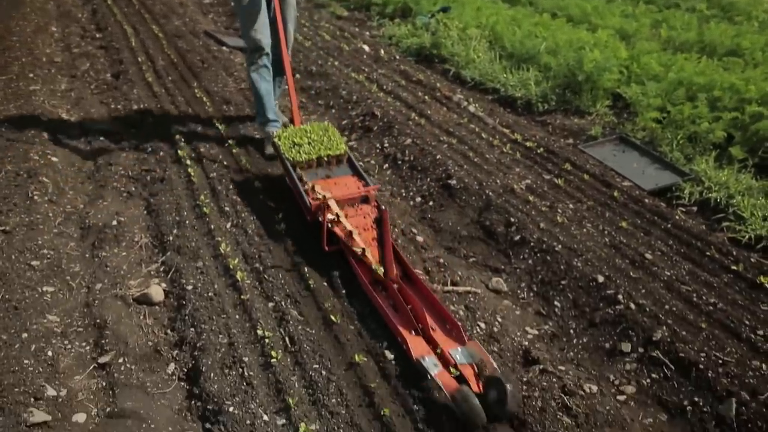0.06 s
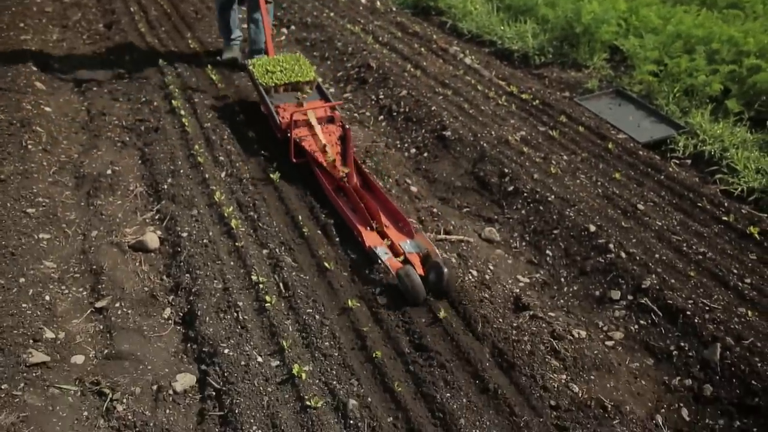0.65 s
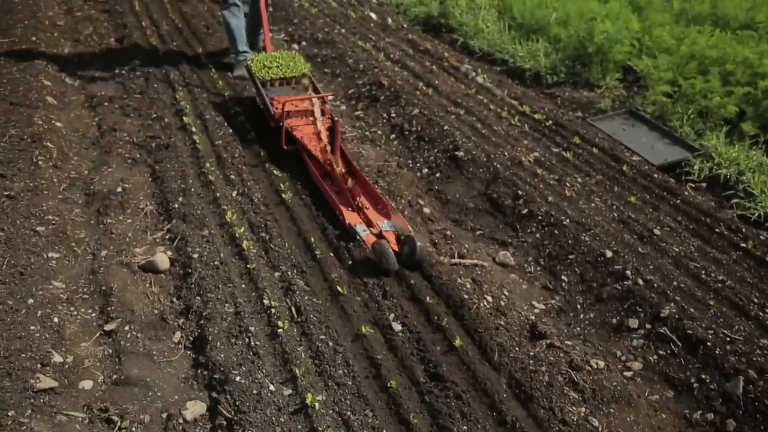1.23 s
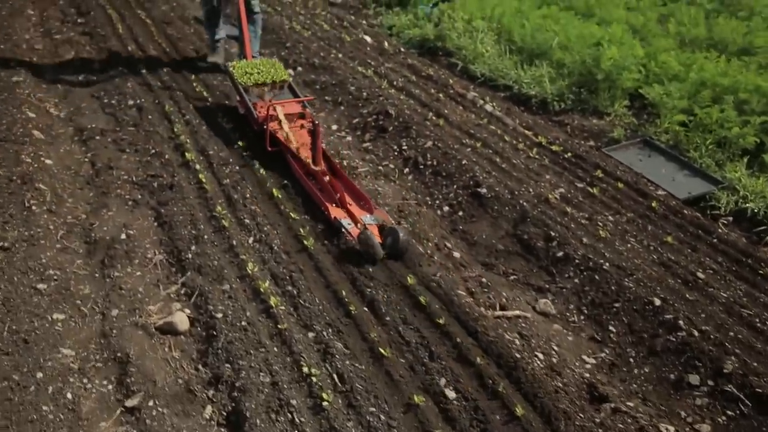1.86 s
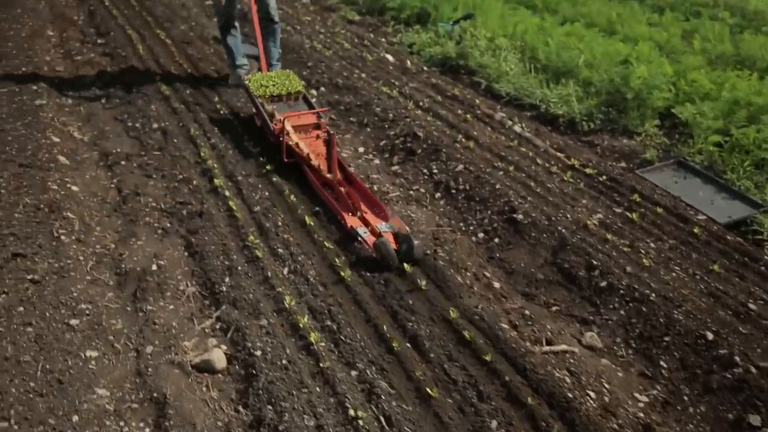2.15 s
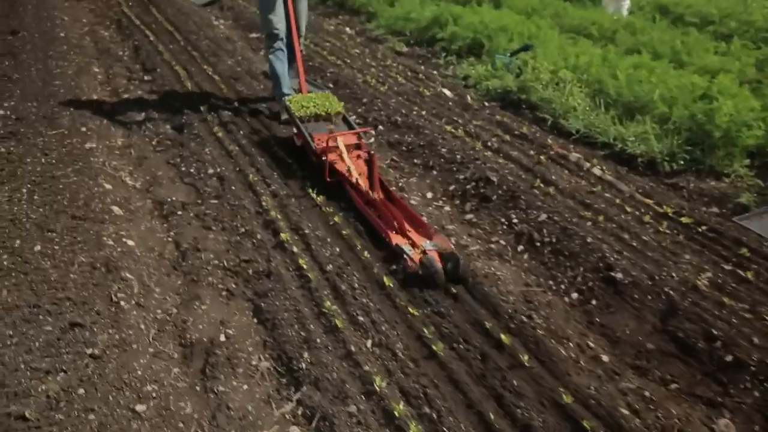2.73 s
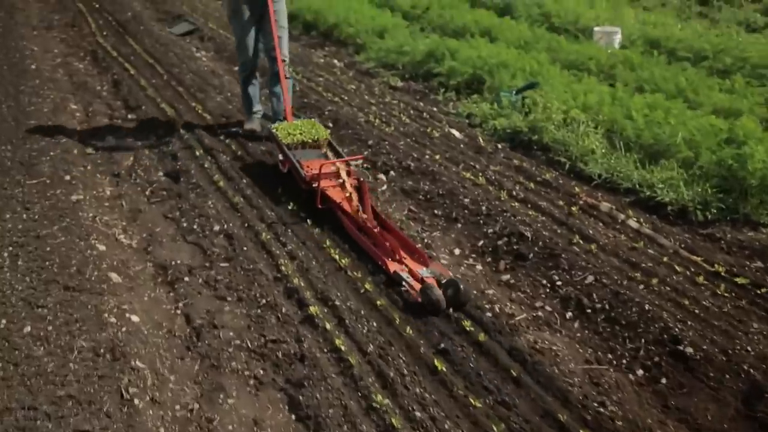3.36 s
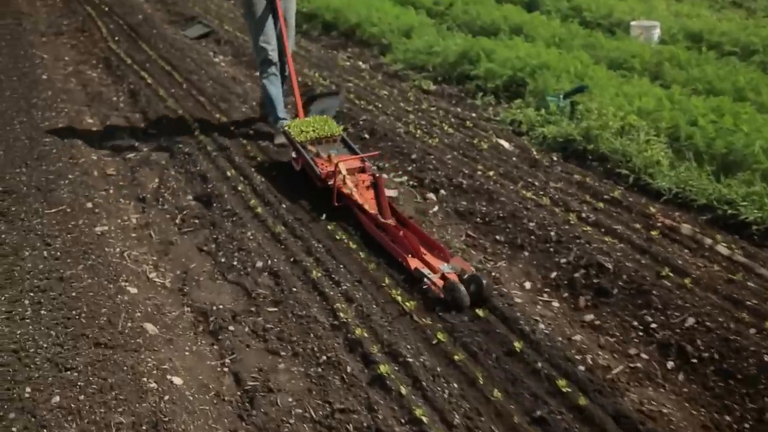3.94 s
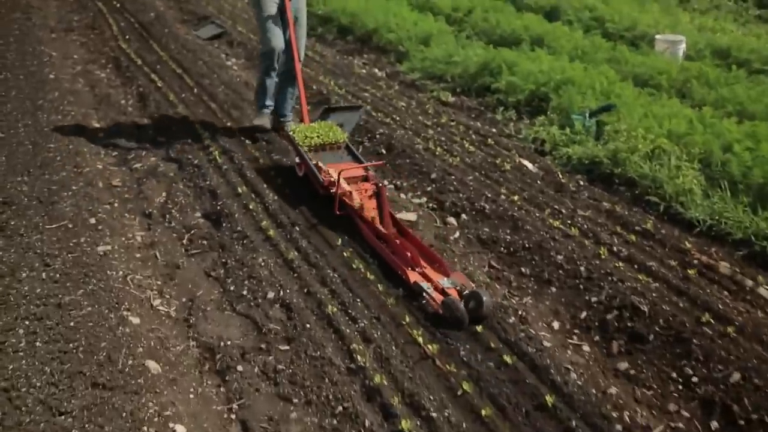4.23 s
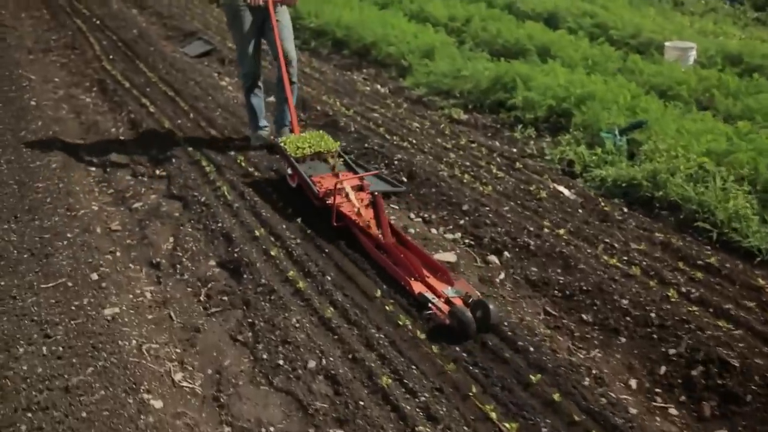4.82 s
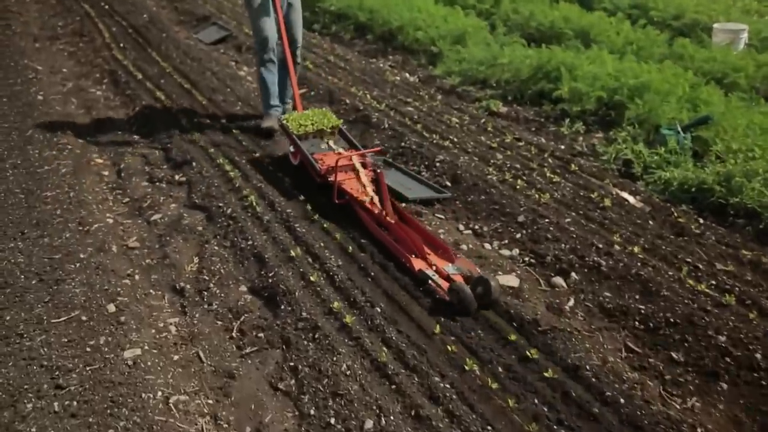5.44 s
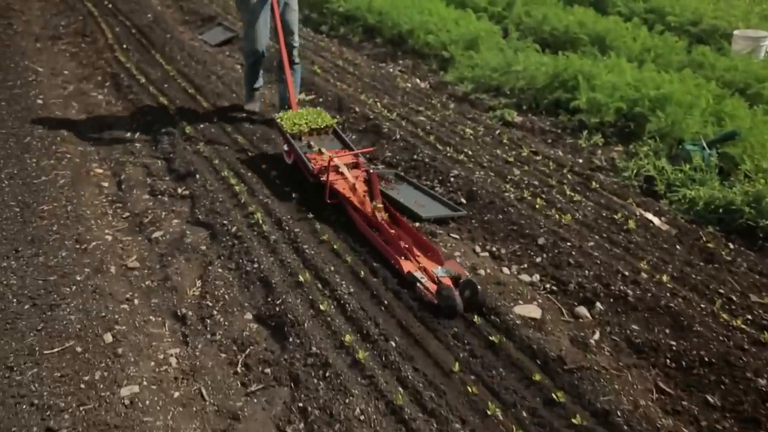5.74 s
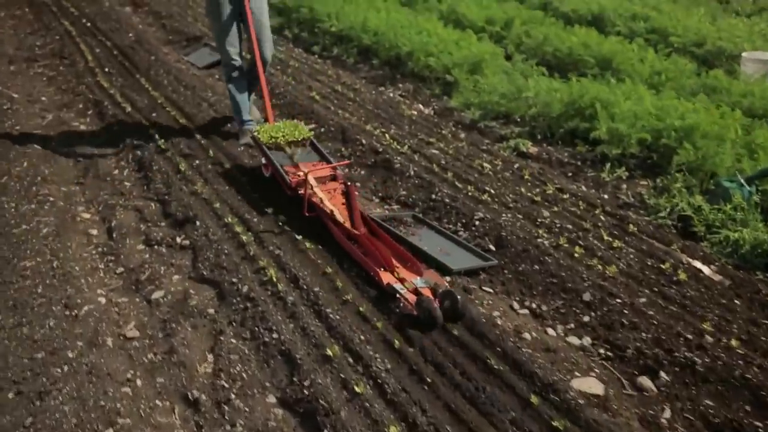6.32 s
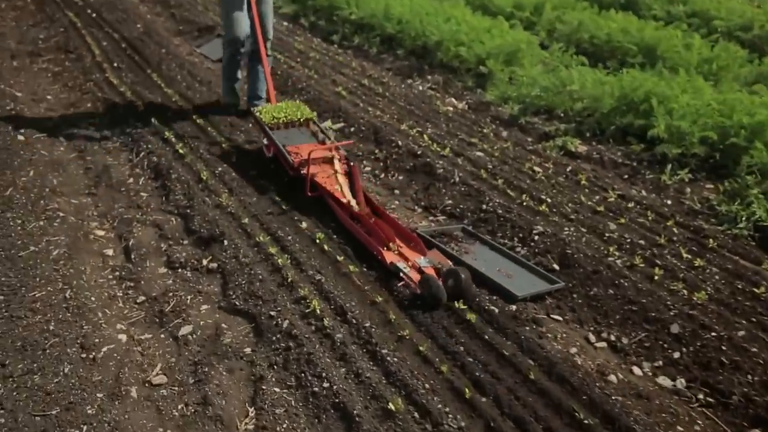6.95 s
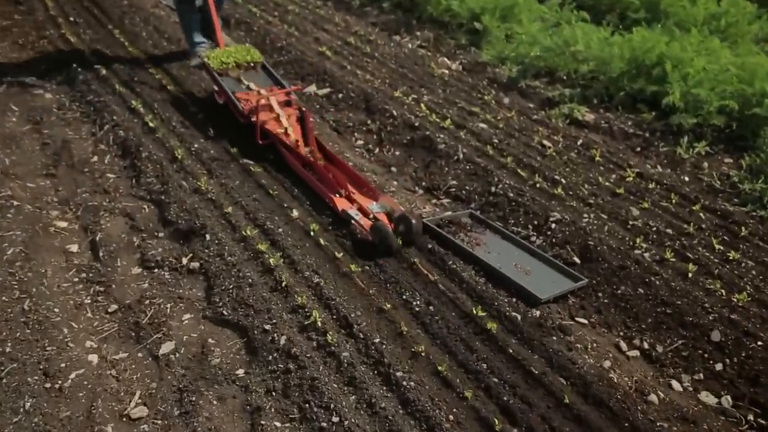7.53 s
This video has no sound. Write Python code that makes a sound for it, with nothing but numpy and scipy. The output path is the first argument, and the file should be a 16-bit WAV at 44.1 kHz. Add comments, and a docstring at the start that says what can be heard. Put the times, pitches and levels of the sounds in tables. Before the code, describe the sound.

A hand-pulled seedling transplanter scrapes and crunches through loose, stony soil, over outdoor hiss and a thin, high insect trill.

```python
"""Scraping and crunching: the steel furrower of a hand-pulled seedling transplanter drags through loose,
stony soil, and the grit rings faintly in its frame. A bush cricket's wing strokes trill thinly over
open-air hiss. Wind puffs at the microphone, and three soft double knocks pass through the camera body.
A dropped plastic tray snaps onto the ground; later the steel grinds once over stones."""
import sys
import numpy as np
from scipy import signal
from scipy.fft import rfft, irfft, next_fast_len
from scipy.io import wavfile
from scipy.ndimage import uniform_filter1d, map_coordinates

SR = 44100
rng = np.random.default_rng(int(sys.argv[2]) if len(sys.argv) > 2 else 0)


def to_wav(sig):
    """Store sig (one row per channel, or 1-D mono) as 16-bit WAV at the path in sys.argv[1].

    Samples outside -1..1 are clipped; the rate is SR.
    """
    pcm = np.clip(np.atleast_2d(sig), -1, 1) * 32767
    pcm = np.round(pcm).astype(np.int16)
    wavfile.write(sys.argv[1], SR, pcm.T)  # frames by channels


N = 334278
TIME_S = np.arange(N) / SR
FFT_SIZE = 2 * next_fast_len(N // 2 + 8192)
FREQS_HZ = np.fft.rfftfreq(FFT_SIZE, 1 / SR)


def amp(db):
    """Decibels to gain."""
    return 10 ** (np.asarray(db) / 20)


def unit(x):
    """Scale a signal or a frequency response to rms 1."""
    return x / np.sqrt(np.mean(np.abs(x) ** 2) + 1e-20)


def curves(rows):
    """Per-sample curve for each column after the time."""
    times_s, *columns = np.transpose(rows)
    return [np.interp(TIME_S, times_s, column) for column in columns]


def wobble(knots_per_s):
    """Smooth random curve."""
    return map_coordinates(rng.standard_normal(int(N * knots_per_s / SR) + 4), [TIME_S * knots_per_s])


def swell(centre_s, half_length_s):
    """Gaussian rise and fall."""
    return np.exp(-np.minimum(((TIME_S - centre_s) / half_length_s) ** 2, 50))


def filtered(x, response):
    """Apply a frequency response."""
    return irfft(rfft(x, FFT_SIZE) * response, FFT_SIZE)[:N]


def colour(points):
    """Causal unit-power response through (frequency [Hz], level [dB]) points."""
    hz, db = np.transpose(points)
    gain = amp(np.interp(np.log(FREQS_HZ + 1), np.log(hz), db))
    cepstrum = irfft(np.log(gain))
    cepstrum[1:FFT_SIZE // 2] *= 2  # fold to minimum phase
    cepstrum[FFT_SIZE // 2 + 1:] = 0
    return unit(np.exp(rfft(cepstrum)))


def resonances(modes):
    """Summed band-pass responses of the modes."""
    return sum(amp(db) * 1j * FREQS_HZ * width_hz / (hz * hz - FREQS_HZ ** 2 + 1j * FREQS_HZ * width_hz)
               for hz, width_hz, db in modes)


def grains(per_s, spread_db, rub):
    """Tiny fractures of uneven size over a share of smooth rubbing; rms 1."""
    sizes = amp(spread_db * np.minimum(rng.exponential(size=N), 4))
    cracks = (rng.random(N) < per_s / SR) * sizes * np.sign(rng.standard_normal(N))
    return unit(unit(cracks) + rub * rng.standard_normal(N))


def soil_shares(db, coarse_db, easy_pull_db=-41):
    """Grit, clod and sand gains: coarse ground gives more clods, less sand; sand gains less from force."""
    clods_db = db - 5 + coarse_db
    sand_db = db - 4 - 0.52 * (db - easy_pull_db) - 0.4232 * coarse_db
    return amp([db, clods_db, sand_db]).reshape(3, -1)


def sliding_forces(stick_slip_db):
    """Grit, clod and sand forces from drag and shoves; the blade sticks and slips."""
    # steady pull: (time [s], level [dB], coarseness [dB])
    drag = [(0, -43.5, -2.5), (0.5, -46.5, -1), (0.9, -45, -4), (1.42, -47.5, -1), (2.0, -40, -2),
            (2.31, -37, -2), (2.39, -46.5, -2), (2.8, -49.5, 5), (2.86, -43, 2), (2.99, -46.5, 2.5),
            (3.14, -40.5, -2), (3.62, -45, 3), (4.3, -45.5, -4.5), (4.8, -46, -0.5), (5.3, -43, -3),
            (5.55, -45, 0.5), (6.25, -41, -2.5), (6.85, -48, 1), (7.05, -40, -1.5), (7.4, -43.5, -6),
            (7.58, -38.5, -7)]
    # tugs shoving heaps of soil: (centre [s], level [dB], half length [s], coarseness [dB])
    shoves = [(0.22, -34, 0.034, -1.5), (0.41, -42, 0.043, 0), (1.026, -43.5, 0.037, 5.5),
              (1.133, -43.5, 0.076, -6), (1.838, -38.5, 0.051, -8), (1.944, -35.5, .025, -6),
              (1.986, -43.5, 0.033, 9), (2.14, -37, 0.076, -6), (2.398, -54, 0.02, -35),
              (3.334, -41, 0.059, -14), (3.59, -43, .02, 7), (3.72, -42.5, 0.03, 3),
              (3.92, -42.5, 0.073, 8), (4.103, -41, 0.051, 0), (4.41, -37, 0.032, 0.5),
              (4.537, -40.5, 0.069, 3.5), (4.69, -40, .025, -1), (5.252, -51, .04, -23),
              (5.372, -37, 0.023, -1.5), (5.849, -33, 0.028, -4), (6.182, -30.5, 0.027, -4.5),
              (6.449, -25.5, .02, -8), (6.61, -38, 0.074, 2), (6.77, -37.5, .018, -2.5),
              (6.973, -36.5, 0.038, -8), (7.197, -41, 0.041, 11), (7.26, -32.5, 0.011, -8)]
    power = soil_shares(*curves(drag)) ** 2
    for centre_s, db, half_length_s, coarse_db in shoves:
        power += (soil_shares(db, coarse_db) * swell(centre_s, half_length_s)) ** 2
    return np.sqrt(power) * amp(stick_slip_db * wobble(90))


def crumbs(count=80, gap_scale_s=1 / 6, db=-43, spread_db=1, length_s=0.003, coarse_spread_db=5):
    """Small crumbs breaking at random, as extra crunch rows."""
    times_s = gap_scale_s * np.cumsum(rng.uniform(0.1, 2, count))
    return [(time_s, db + spread_db * loud, length_s, coarse_spread_db * coarse)
            for time_s, (loud, coarse) in zip(times_s, rng.standard_normal((count, 2)))
            if time_s < TIME_S[-1]]


def crunch_forces(attack_s=0.00055, snap_db=-0.5, snap_s=0.0016, trickle_db=-14.5, trickle_s=0.022):
    """Grit, clod and sand forces from crunches: each snaps, crumbles, then trickles."""
    # stones and clods cracking: (time [s], level [dB], length [s], coarseness [dB])
    crunches = [(0.122, -37.5, 0.0046, 10.5), (0.39, -30.5, 0.0066, -5), (0.591, -42, 0.0099, 9.5),
                (0.87, -34, 0.011, -10), (0.926, -35, 0.0057, -14), (0.997, -33, 0.011, -1),
                (1.171, -37, .011, -15), (1.591, -32.5, .02, -2), (1.737, -31, 0.015, -1.5),
                (1.789, -35, .018, -2), (2.023, -36.5, 0.013, -8), (2.189, -30.5, 0.011, 5),
                (2.255, -34, 0.0035, -12), (2.34, -33.5, 0.027, -20), (2.597, -35, 0.0094, -10),
                (2.76, -43.5, .011, 11.5), (2.959, -33, .008, 0), (3.018, -39.5, 0.013, 7.5),
                (3.255, -29.5, 0.0091, -12), (3.304, -32.5, 0.0046, 13), (3.5642, -27.5, 0.0098, 3),
                (3.746, -29.5, 0.012, -5), (3.829, -25, .034, -4), (3.852, -26.5, 0.021, 5),
                (3.946, -36, 0.024, -3), (4.039, -35.5, .008, 0), (4.126, -34.5, 0.014, -0.5),
                (4.427, -30, 0.023, 9.5), (4.45, -27.5, 0.019, 0.5), (4.471, -27.5, .019, 5),
                (4.51, -29, 0.0078, 4.5), (4.631, -34, 0.0071, -4), (4.876, -29, 0.0086, -1.5),
                (5.061, -35.5, 0.0037, 8), (5.186, -39, 0.0093, -26), (5.301, -34, 0.012, -7),
                (5.4, -28, 0.01, -1), (5.687, -30, 0.0079, -4), (5.754, -32, 0.029, 0),
                (5.801, -29, 0.026, 7.5), (5.818, -26.5, .0093, -2), (5.926, -30.5, 0.013, 2),
                (5.951, -30.5, 0.017, -2), (6.2637, -18.5, 0.013, -0.5), (6.316, -24.5, 0.014, -2),
                (6.557, -34.5, 0.018, 15.5), (6.629, -27, .007, -6), (6.657, -36, 0.022, 10.5),
                (6.833, -36, .0048, -14), (6.91, -24.5, 0.0057, 7), (7.497, -35, 0.02, 3)]
    force = np.zeros((3, N))
    for time_s, db, length_s, coarse_db in crunches + crumbs():
        start = int(time_s * SR)
        t = TIME_S[:min(SR // 8, N - start)]
        snap = amp(snap_db) * np.exp(-t / snap_s)
        crumble = np.exp(-(t / length_s) ** 2.1)
        trickle = amp(trickle_db) * np.exp(-t / trickle_s)
        burst = (1 - np.exp(-t / attack_s)) * np.sqrt(snap ** 2 + crumble ** 2 + trickle ** 2)
        force[:, start:start + len(t)] += soil_shares(db, coarse_db) * burst
    return force


def furrower():
    """Sliding and crunching break grit, clods and sand; all three ring a little in the frame."""
    # steel frame: (frequency [Hz], width [Hz], gain [dB])
    frame_modes = [(702, 80, -8.5), (850, 64, 0.5), (1094, 170, -8), (1862, 215, 4), (2252, 21, 1.5),
                   (3010, 420, -7), (3310, 62, 2.5), (3630, 200, 3.5), (3994, 144, 1), (6640, 810, -10.5),
                   (9360, 1700, -5.5)]
    # soil spectra: (frequency [Hz], density [dB])
    grit_spectrum = [(500, -39), (1100, -7), (1600, -3), (2800, 2), (3900, -4), (5000, -4.5), (7000, -12.5),
                     (14000, -23)]
    clod_spectrum = [(150, -13), (420, -14.5), (620, -0.5), (950, -2.5), (1300, -0.5), (1700, -10.5),
                     (3000, -38)]
    sand_spectrum = [(2500, -46.5), (4500, 0.5), (6000, 2), (7300, 1.5), (8200, -1), (10000, -2.5),
                     (11500, -4.5), (15500, -6)]
    crunching = crunch_forces()
    sliding = sliding_forces(stick_slip_db=1.66)
    grit_force, clod_force, sand_force = np.hypot(sliding, crunching)  # power sum
    grit = grit_force * grains(per_s=2700, spread_db=3, rub=0.7)
    clods = clod_force * grains(per_s=2000, spread_db=5, rub=0.7)
    sand = sand_force * grains(per_s=2500, spread_db=3.5, rub=0.66)
    frame = 1 + resonances(frame_modes)
    return (filtered(grit, unit(colour(grit_spectrum) * frame))
            + filtered(clods, unit(colour(clod_spectrum) * frame))
            + filtered(sand, unit(colour(sand_spectrum) * frame)))


def earth():
    """Soft earth pushed aside: a dull, grainy rustle."""
    # push on the earth: (time [s], level [dB])
    push = [(0, -54.5), (1.85, -56), (2.25, -46), (2.75, -48.5), (2.95, -56), (3.28, -42.5), (3.5, -51),
            (3.92, -46.5), (4.15, -57.5), (4.45, -48.5), (5.3, -51.5), (7.57, -54.5)]
    dull = colour([(80, -24.5), (220, 0.5), (340, 1), (500, 0.5), (800, -8), (2000, -71)])
    return amp(curves(push)[0]) * filtered(grains(per_s=700, spread_db=2.5, rub=1), dull)


def changing_contact(x, depth_db):
    """Each stone and clod has its own resonances, so the colour shifts as the blade moves on."""
    spectra = signal.stft(x, nperseg=512)[2]
    shading = rng.standard_normal(spectra.shape)
    for size, axis in [(3, 0), (7, 1), (3, 1)]:  # smooth in frequency, then twice in time
        shading = uniform_filter1d(shading, size=size, axis=axis)
    shaded = spectra * amp(depth_db * unit(shading))
    shaded *= np.linalg.norm(spectra, axis=0) / (np.linalg.norm(shaded, axis=0) + 1e-20)  # keep power
    return signal.istft(shaded, nperseg=512)[1][:N]


def air():
    """Open-air background and faint steady hiss."""
    # background spectrum: (frequency [Hz], density [dB])
    spectrum = [(15, -43), (25, -14), (60, -0.5), (120, 6), (180, -1.5), (310, 1.5), (450, -11), (700, 0.5),
                (1500, -5.5), (3500, -5), (5500, -9.5), (11000, -9), (14000, -6), (15600, -4)]
    return amp(-42.5 + 0.18 * wobble(6.1)) * filtered(rng.standard_normal(N), colour(spectrum))


def cricket(db, strokes_per_s, stroke_width_cycles):
    """Each wing stroke is a brief rasp at the top of hearing."""
    cycle = np.cumsum(strokes_per_s + 0.87 * wobble(6.7)) / SR % 1
    strokes = np.exp(-((cycle - 0.5) / stroke_width_cycles) ** 2) * amp(2 * wobble(40))
    wing = colour([(8000, -36), (12000, -5), (14300, -15), (15000, -9), (15600, 0), (16500, 4),
                   (18000, -28)])
    return amp(db) * unit(filtered(strokes * rng.standard_normal(N), wing))


def pebbles():
    """Passing steel rubs one resonance of each pebble, swelling and fading with the contact."""
    # pebbles and hollow clods: (centre [s], level [dB], pitch [Hz], width [Hz], half length [s])
    rubs = [(0.029, -35, 9200, 1100, .015), (0.395, -31, 2350, 450, .011), (1.033, -37, 1290, 600, .028),
            (1.136, -42, 12100, 1400, .032), (1.542, -42, 1940, 220, .035), (1.67, -42.5, 1860, 150, .038),
            (1.799, -34.5, 1800, 139, .021), (2.258, -30.5, 10500, 2000, .0025),
            (2.602, -38, 6560, 300, .0075), (2.841, -36, 2160, 80, .016), (2.851, -35, 3100, 600, 0.013),
            (2.86, -33.5, 6560, 500, .006), (3.045, -35.5, 3620, 300, .02), (5.64, -35.5, 3780, 600, .0076),
            (5.82, -28.5, 10080, 400, .0044), (5.939, -33, 4400, 220, .015),
            (5.995, -37.5, 4570, 170, .012), (5.132, -39, 835, 150, .02), (6.667, -33, 715, 260, .012),
            (6.913, -27, 890, 240, .007), (7.191, -38, 720, 280, .03)]
    out = np.zeros(N)
    for centre_s, db, hz, width_hz, half_length_s in rubs:
        reach_s = 3 * half_length_s
        near = slice(max(0, int((centre_s - reach_s) * SR)), int((centre_s + reach_s) * SR))
        contact = swell(centre_s, half_length_s)[near]
        friction = contact * rng.standard_normal(len(contact))
        ring = signal.lfilter(*signal.iirpeak(hz, hz / width_hz, SR), friction)
        out[near] += amp(db) * unit(ring) * np.sqrt(np.mean(contact ** 2))
    return out


def wind(breeze_db):
    """Low buffeting at the microphone; single eddies each give one pressure pulse."""
    # wind puffs: (centre [s], level [dB], half length [s])
    puffs = [(1.957, -44, 0.041), (3.862, -51, .08), (4.328, -37.5, 0.028), (4.403, -34, 0.033),
             (4.52, -49, 0.093), (6.78, -41.5, 0.054), (6.995, -47.5, 0.11)]
    # single eddies: (time [s], peak [dB], pitch [Hz])
    eddies = [(4.314, -22.5, 80), (4.388, -22, 105), (4.411, -19.5, 131), (6.745, -24.5, 87),
              (6.777, -22.5, 87.5)]
    strength = amp(breeze_db)
    for centre_s, db, half_length_s in puffs:
        strength = strength + amp(db) * swell(centre_s, half_length_s)
    rumble = colour([(12, -14), (30, -9), (55, 4), (110, -4.5), (200, -9), (350, -14), (900, -72)])
    out = strength * filtered(rng.standard_normal(N), rumble)
    for time_s, db, hz in eddies:
        phase_squared = (np.pi * hz * (TIME_S - time_s)) ** 2
        out -= amp(db) * (1 - 2 * phase_squared) * np.exp(-np.minimum(phase_squared, 50))
    return out


def knocks(body_hz, t60_s, rebound_s, rebound_db, attack_s=0.0017):
    """Each knock and its rebound ring one low, damped mode of the camera body."""
    # blows to the body: (time [s], level [dB])
    blows = [(2.976, -21.5), (3.2323, -22), (3.4799, -22)]
    t = TIME_S[:SR // 6]
    envelope = amp(-60 * t / t60_s) * (1 - np.exp(-t / attack_s))
    ring = -np.sin(2 * np.pi * body_hz * t) * envelope
    out = np.zeros(N)
    for time_s, db in blows:
        out[int(time_s * SR):][:len(t)] += amp(db) * ring
        out[int((time_s + rebound_s) * SR):][:len(t)] += amp(db + rebound_db) * ring
    return out


def tray(tick_t60_s=0.013, thud_t60_s=0.044):
    """The tray lands in quick contacts, each a dry plastic snap, a tick and a small thud of soil."""
    # edge contacts: (time [s], snap peak [dB], tick trim [dB])
    contacts = [(4.9498, -20.5, 4), (4.9524, -13.5, -9), (4.9546, -2, -29), (4.959, -20.5, -1)]
    # plastic tray: (frequency [Hz], width [Hz], gain [dB])
    tray_modes = [(560, 110, -16), (780, 160, -7), (1610, 580, -3), (2900, 380, 12), (3580, 820, 9),
                  (4900, 650, -15)]
    t = TIME_S[:SR // 20]
    press = np.exp(-((t - 0.00018) / 0.00005) ** 2)  # yielding soil rounds the blow
    snap = filtered(press, resonances(tray_modes))[:len(t)]
    snap /= np.abs(snap).max()
    snaps, ticks, thuds = np.zeros((3, N))
    for time_s, db, tick_db in contacts:
        start = int(time_s * SR)
        span = slice(start, start + len(t))
        snaps[span] += amp(db) * snap
        ticks[span] += amp(db + tick_db - 5 - 60 * t / tick_t60_s) * rng.standard_normal(len(t))
        thuds[span] += amp(db - 23 - 60 * t / thud_t60_s) * rng.standard_normal(len(t))
    bright = colour([(1000, -12), (3500, 2), (7000, -4), (12000, -5), (15500, -15)])
    dull = colour([(80, -17), (260, -3.5), (420, -7), (600, 0), (800, 1.5), (1050, -18), (2000, -6),
                   (6000, -25), (14000, -45)])
    return snaps + filtered(ticks, bright) + filtered(thuds, dull)


def grind(start_s, db, attack_s=0.015, hold_s=0.23, release_s=0.041, sag_db_per_s=18.5):
    """Steel over stones bites, eases off and lets go: dense slips with a hollow ring."""
    # stone spectrum: (frequency [Hz], density [dB])
    spectrum = [(300, -33), (520, -16), (640, -10), (750, -6), (950, 4), (1130, 1), (1330, -6.5),
                (2050, -2), (2300, -1), (2950, 2.5), (4000, -11), (7500, -15.5), (11000, -22), (15500, -35)]
    t = TIME_S - start_s
    contact = np.interp(t, np.cumsum([0, attack_s, hold_s, release_s]), [0, 1, 1, 0])
    pressure = amp(db - sag_db_per_s * np.maximum(t, 0) + 1.5 * wobble(120))
    slips = grains(per_s=2400, spread_db=3.4, rub=0.7)
    return filtered(contact * pressure * slips, colour(spectrum))


def scene():
    """All sources at one microphone in the open field."""
    soil = changing_contact(furrower() + earth() + grind(start_s=6.275, db=-25), depth_db=2.6)
    field = air() + cricket(db=-48.5, strokes_per_s=105, stroke_width_cycles=0.2)
    camera = wind(breeze_db=-61) + knocks(body_hz=195, t60_s=0.061, rebound_s=0.0167, rebound_db=-2)
    return (soil + pebbles() + tray() + field + camera)[None]


def record(dry):
    """The camera passes nothing above its band limit."""
    band_limit_hz = 15830
    return filtered(dry[0], FREQS_HZ < band_limit_hz)[None]


dry = scene()
out = record(dry)
to_wav(out)
```